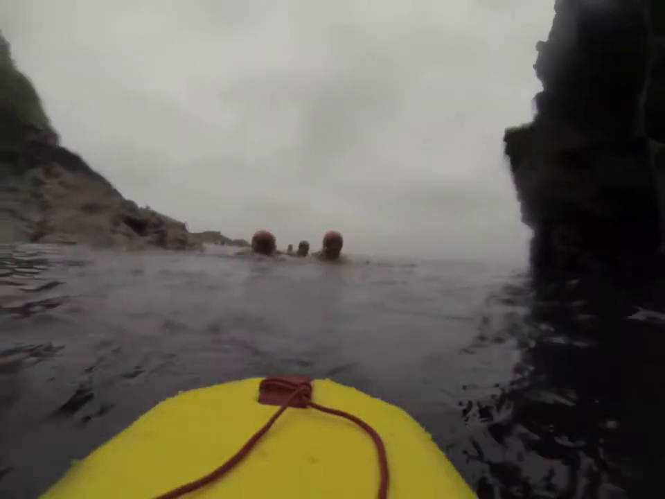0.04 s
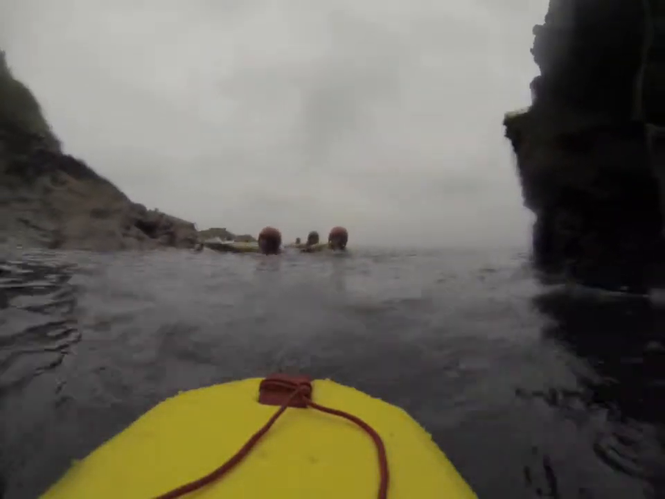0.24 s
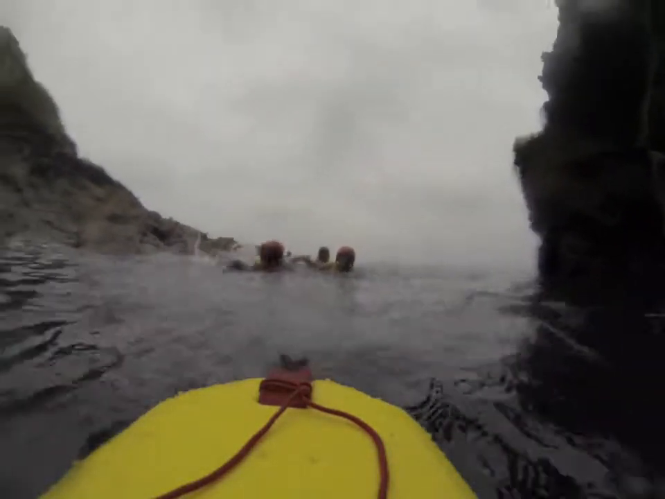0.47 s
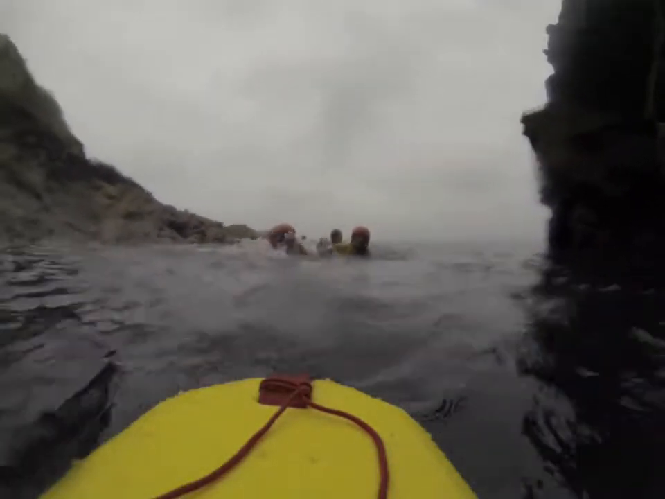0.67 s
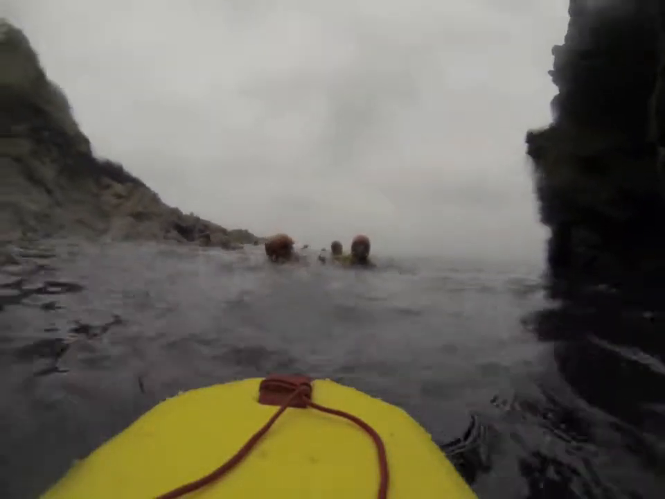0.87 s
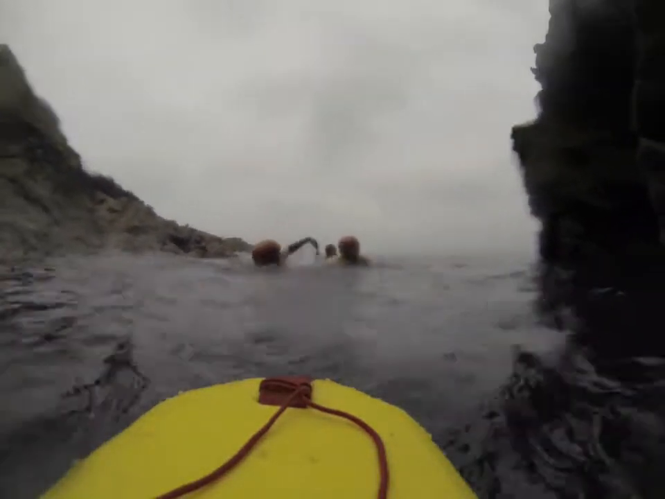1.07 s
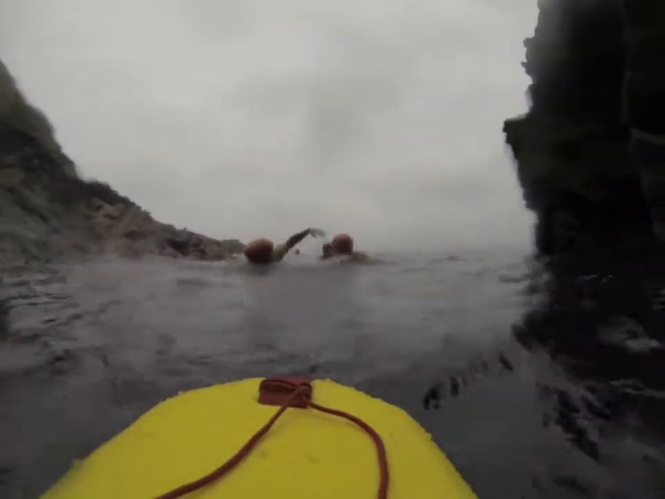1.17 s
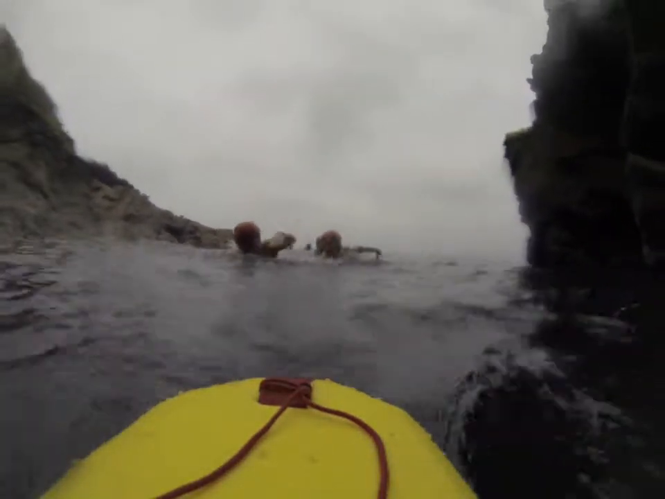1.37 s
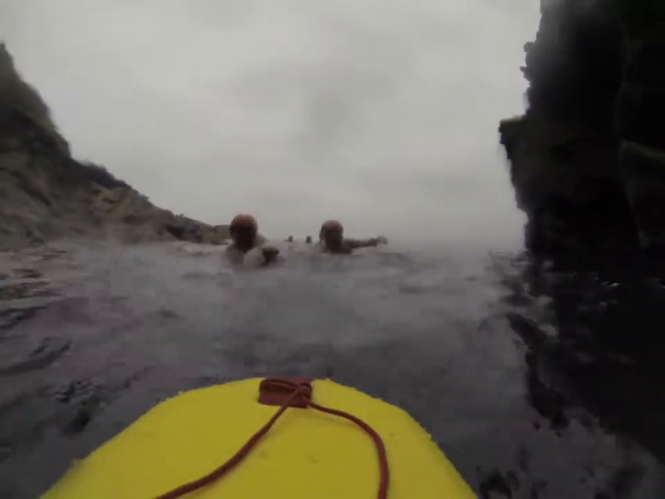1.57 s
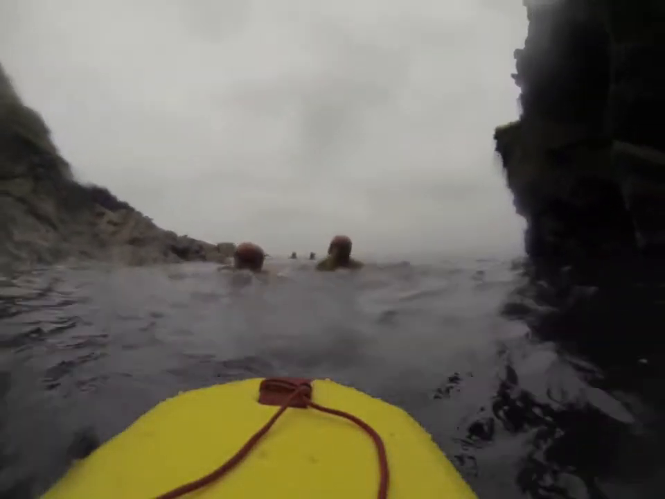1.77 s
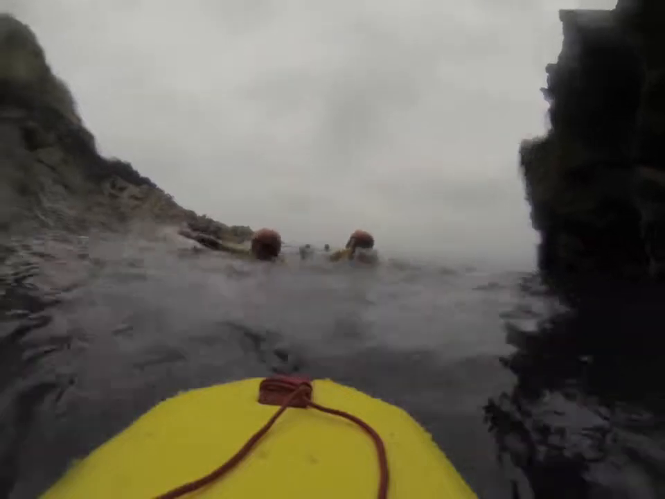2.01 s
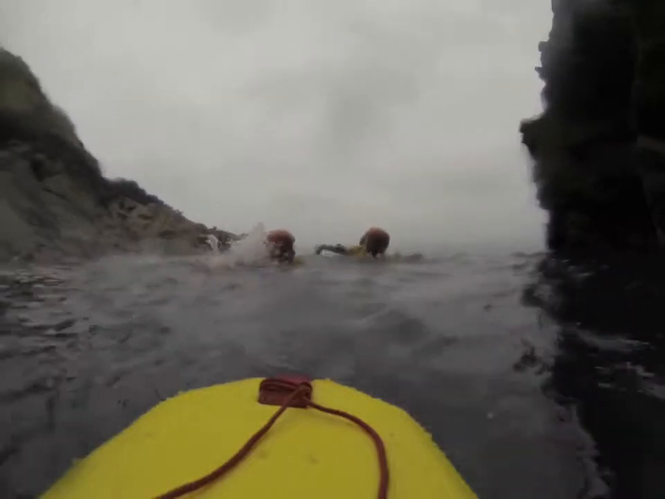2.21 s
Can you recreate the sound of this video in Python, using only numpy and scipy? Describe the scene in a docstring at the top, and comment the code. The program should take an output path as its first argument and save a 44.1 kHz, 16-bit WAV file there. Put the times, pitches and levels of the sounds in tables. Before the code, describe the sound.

Water slaps under a floating board, muffled and close in mono through a waterproof case. Soft hollow gulps cluster at 0.2-0.4 s; by far the loudest, a deep thump, lands at 0.58 s with a low shudder. A sharper drop knock comes at 0.85 s, weaker thuds near 0.9, 1.33, 1.8 and 2.08 s. Faint gurgling, bubble plips, wavering hollow rush and fine foam fizz run throughout, with tiny spray bursts around 1.65 and 2.1 s.

```python
"""Under a floating board on choppy sea water, heard from a waterproof case fixed on its deck.
Slapped air pockets thump and gulp as short falling rings; heavy wavelets thud the board as low rings.
The board shudders as a wandering low sine with rumble; drops ring the case's resonances.
Bubbles plip and gurgle as rising rings; spray, rush and fizz are coloured hiss mixed with clicks.
"""
import sys
import numpy as np
from scipy import signal
from scipy.fft import rfft, irfft
from scipy.io import wavfile
from scipy.ndimage import uniform_filter1d

SR = 44100
rng = np.random.default_rng(int(sys.argv[2]) if len(sys.argv) > 2 else 0)


def transcribe(u):
    """Save the signal u as a 16-bit wav file named by the first command-line argument.

    u: samples, shape (n,) or (channels, n), limited to [-1, 1]; the rate is SR.
    q: integer samples, one column per channel.
    """
    v = np.clip(np.atleast_2d(u).T, -1, 1)
    q = np.round(v * 32767).astype(np.int16)
    wavfile.write(sys.argv[1], SR, q)


N = 99225

# Spectra give relative amplitude; coloured() sets their rms to one.
# Air pockets slapped shut under the board: [t/s, peak level/dB, starting f/Hz, swell/s]
AIR_POCKETS = [(0.004, -42.5, 188.4, 0.0064), (0.163, -45, 213, 0.01), (0.195, -43, 205, 0.0053),
               (0.234, -35.5, 216, 0.0062), (0.260, -37, 228, 0.0036), (0.284, -36.5, 238, 0.0022),
               (0.318, -37.5, 213, 0.0043), (0.336, -38.5, 207, 0.0082), (0.392, -42, 231, 0.0066),
               (0.493, -48, 193, 0.01), (0.5798, -18.5, 187, 0.0048), (0.583, -30.5, 331, 0.0031),
               (0.601, -35.5, 192, 0.0042), (0.641, -42, 225, 0.0055), (0.695, -40, 201, 0.0045),
               (0.777, -49.5, 238, 0.0115), (0.803, -51, 197, 0.01), (0.858, -41.5, 228, 0.0055),
               (0.9084, -32, 218, .004), (0.924, -44.5, 195, 0.0054), (1.134, -37.5, 214, 0.0033),
               (1.332, -32.5, 195, 0.0035), (1.343, -54, 237, 0.0071), (1.365, -39.5, 204, 0.0057),
               (1.451, -43, 215, 0.0044), (1.772, -36, 225, 0.0052), (1.804, -29.5, 229, 0.0067),
               (1.832, -34, 203, 0.0059), (1.979, -48.5, 205, 0.0084), (2.0806, -35.5, 220, 0.0067)]
# Churning water over the slaps: [f/Hz, relative level/dB]
CHURN_SPECTRUM = [(150, 8), (450, 9), (750, -7), (1500, -33), (5000, -54)]
# Heavier wavelets that thud the board: [t/s, peak level/dB, f/Hz, swell/s]
BOARD_THUDS = [(0.246, -36.5, 70.4, 0.011), (0.287, -32, 84.4, 0.013), (0.329, -32, 46.4, 0.0059),
               (0.581, -13, 63.3, 0.0044), (0.607, -28.5, 86, 0.0083), (0.904, -28, 47.5, 0.0041),
               (0.905, -39.5, 120, 0.0071), (1.327, -33, 54.6, 0.0048), (1.369, -46, 75, 0.0093),
               (1.449, -39, 76, 0.011), (1.785, -36, 72.5, 0.0044), (1.818, -28.5, 69, 0.0078),
               (2.082, -28.5, 71.4, 0.0028)]
# Slow shudder of the board, before SHUDDER_GAIN_DB: [t/s, level/dB]
SHUDDER_LEVEL = [(0.0, -45), (0.32, -40.5), (0.35, -32.5), (0.56, -42.5), (0.6, -25.5), (0.68, -26),
                 (0.76, -52.5), (0.82, -35.5), (0.86, -61), (0.91, -32.5), (1.01, -44), (1.06, -59),
                 (1.47, -40.5), (1.78, -48.5), (1.88, -31), (2.09, -50.5), (2.21, -40), (2.25, -50)]
# Rumble of the board: [f/Hz, relative level/dB]
RUMBLE_SPECTRUM = [(15, -13.5), (35, -5.5), (55, -1.5), (85, -7), (130, -18.5), (300, -57), (1000, -93)]
# Drops that hit the case: [t/s, knock level before the mode levels/dB, tick peak level/dB, tick f/Hz]
CASE_DROPS = [(0.3324, -35.5, -76, 6300), (0.618, -41, -72, 6300), (0.8470, -26, -49.5, 11360),
              (0.9118, -40, -72, 6300), (1.0850, -42, -57, 6200), (1.0980, -49, -50, 6670),
              (1.3310, -43, -70, 6400), (1.371, -54, -63, 6400), (1.4460, -61, -52.5, 7160),
              (1.9908, -41, -73, 6300), (2.0258, -41, -70, 6300)]
# Resonances of the case: [f/Hz, level relative to the knock/dB, width/Hz]
CASE_MODES = [(1410, -3, 120), (2230, -28.5, 75), (3670, -19, 300), (4900, -32, 500), (6500, -37, 220)]
# Single bubbles that plip near the case: [t/s, peak level/dB, starting f/Hz]
SINGLE_BUBBLES = [(0.331, -49, 470), (0.571, -52, 750), (0.646, -55, 640), (0.904, -48, 430),
                  (0.912, -49, 698), (0.918, -44, 3350), (1.081, -46, 1740), (1.093, -46, 900),
                  (1.328, -50, 600), (1.432, -50, 880), (1.682, -47, 2270), (1.754, -54, 2320),
                  (1.868, -49.5, 2220), (1.942, -55, 2180), (2.228, -50, 603)]
# Small splashes of spray: [peak t/s, level/dB, Gaussian sigma/s]
SPRAY_BURSTS = [(0.393, -63, 0.015), (1.61, -62, 0.0088), (1.654, -58, 0.0098), (2.089, -55.5, .008),
                (2.14, -58.5, 0.039), (2.149, -55, 0.0054)]
# Spray: [f/Hz, relative level/dB]
SPRAY_SPECTRUM = [(1000, -7), (1900, -4), (2280, 9.5), (2800, -4.5), (3600, 8.5), (4300, -1), (4900, 0),
                  (5600, -8), (6400, -6), (8500, -16.5), (11000, -17.5), (14500, -32)]
# Gurgling along the edge of the board: [t/s, level/dB]
GURGLE_LEVEL = [(0, -71), (0.2, -63), (0.36, -60), (0.5, -79), (0.66, -65.5), (0.86, -72.5), (1.02, -65.5),
                (1.09, -65), (1.2, -72), (1.44, -62.5), (1.7, -71), (1.87, -56.5), (2.0, -73), (2.19, -81),
                (2.24, -53.5)]
# Hollow rush of the sea inside the case: [f/Hz, relative level/dB]
RUSH_SPECTRUM = [(40, 5.5), (80, -8), (200, -4.5), (320, -6), (560, -10.5), (790, -7), (1030, -11),
                 (1150, -9), (1280, 1.5), (1420, 1), (1580, -5), (1750, -10.5), (1960, -17.5),
                 (2800, -51.5)]
# Rush, before RUSH_GAIN_DB: [t/s, level/dB]
RUSH_LEVEL = [(0, -53.5), (0.09, -59.5), (0.2, -52.5), (0.29, -55), (0.39, -51.5), (0.5, -54),
              (0.62, -53.5), (0.72, -55), (0.8, -51), (0.93, -52.5), (1.2, -56.5), (1.55, -54),
              (1.75, -54.5), (1.88, -50), (1.98, -53.5), (2.06, -53.5), (2.25, -53.5)]
# Fine fizz of the foam, through the case: [f/Hz, relative level/dB]
FIZZ_SPECTRUM = [(1300, -24), (1900, -9), (2240, 0), (2760, -8.5), (3050, -3.5), (3330, 0), (3650, 3),
                 (4250, -10.5), (5000, -8.5), (5550, -16.5), (6350, -13), (7200, -18), (8100, -17),
                 (9000, -21.5), (11200, -23), (14800, -30.5)]
# Fizz: [t/s, level/dB]
FOAM_LEVEL = [(0, -64), (0.27, -64.5), (0.39, -63), (0.63, -61), (0.73, -61.5), (0.93, -61.5), (1.2, -63.5),
              (1.68, -61.5), (1.95, -62.5), (2.1, -62), (2.25, -60)]

POCKET_GLIDE_PER_S, CHURN_DB = -1.9, -45  # churn relative to the slap envelope
SHUDDER_HZ, SHUDDER_WANDER_SHARE, SHUDDER_WANDER_HZ = 24.9, 0.091, 4.63
SHUDDER_GAIN_DB, RUMBLE_DB = 1.5, -17  # rumble relative to the shudder
TICK_SWELL_S, KNOCK_SWELL_S = 0.00039, 0.0018  # knock: first case mode
PLIP_SWELL_CYCLES, PLIP_GLIDE_PER_S = 2.98, 2
BUBBLES_PER_S, BUBBLE_LOW_HZ, BUBBLE_HIGH_HZ = 600, 497, 1275
BUBBLE_SWELL_CYCLES, BUBBLE_GLIDE_PER_S, BUBBLE_RANGE_DB = 2.1, 2, 14
CLICKS_PER_S, CLICK_SPREAD_DB = 700, 4
RUSH_CLICK_DB, FIZZ_CLICK_DB, SPRAY_CLICK_DB = -7.5, -7, -1  # relative to smooth hiss
RUSH_GAIN_DB, RUSH_FLUTTER_DB, FIZZ_FLUTTER_DB, FLUTTER_HZ = 2, 1.05, 0.47, 24
RUSH_WAVER_SHARE, RUSH_WAVER_HZ = 0.02465, 6.98
CUTOFF_HZ = 15000


def from_db(db):
    """Decibels to amplitude gain."""
    return 10 ** (np.asarray(db) / 20)


def rms_one(x):
    """Scale to unit rms."""
    return x / np.sqrt(np.mean(x ** 2) + 1e-20)


def in_time(rows):
    """Join (time, value) rows by straight lines."""
    return np.interp(np.arange(N) / SR, *np.transpose(rows))


def drift(corner_hz):
    """Unit-rms slow noise: two equal low-pass poles at 1/40 of the sample rate, interpolated."""
    step, settle = 40, 2000
    pole = np.exp(-2 * np.pi * corner_hz * step / SR)
    noise = rng.standard_normal(N // step + settle + 2)
    slow = signal.lfilter([1], [1, -2 * pole, pole * pole], noise)[settle:]
    return np.interp(np.arange(N) / step, np.arange(len(slow)), rms_one(slow))


def coloured(x, spectrum):
    """Shape by a spectrum, linear in dB over log frequency; unit rms."""
    hz, db = np.transpose(spectrum)
    bins_hz = np.maximum(np.arange(N // 2 + 1) * SR / N, 1)
    gain = from_db(np.interp(np.log(bins_hz), np.log(hz), db))
    return rms_one(irfft(rfft(x) * gain, N))


def add_ring(out, start_s, peak_db, hz, swell_s, glide_per_s=0):
    """Add a sine that swells to its peak and dies away, gliding by a share of its pitch per second."""
    start = int(np.clip(start_s * SR, 0, N - 1))
    t = np.arange(min(int(10 * swell_s * SR), N - start)) / SR
    envelope = (t / swell_s * np.exp(1 - t / swell_s)) ** 2
    ring = np.sin(2 * np.pi * hz * t * (1 + glide_per_s * t / 2))
    out[start:start + len(t)] += from_db(peak_db) * envelope * ring


def crackle(click_db):
    """Smooth hiss mixed with the random clicks of bursting bubbles."""
    sizes_db = CLICK_SPREAD_DB * np.minimum(rng.exponential(1, N), 5)
    sizes = from_db(sizes_db) * rng.choice([-1, 1], N)
    clicks = sizes * (rng.random(N) < CLICKS_PER_S / SR)
    return rng.standard_normal(N) + from_db(click_db) * rms_one(clicks)


def slaps():
    """Each air pocket rings for a few cycles, falling in pitch; churning water follows its envelope."""
    rings = np.zeros(N)
    for start_s, peak_db, hz, swell_s in AIR_POCKETS:
        add_ring(rings, start_s, peak_db, hz, swell_s, POCKET_GLIDE_PER_S)
    envelope = np.abs(signal.hilbert(rings))
    churn = coloured(rng.standard_normal(N), CHURN_SPECTRUM)
    return rings + from_db(CHURN_DB) * envelope * churn


def board_thuds():
    """Heavier wavelets ring the board low and briefly."""
    out = np.zeros(N)
    for start_s, peak_db, hz, swell_s in BOARD_THUDS:
        add_ring(out, start_s, peak_db, hz, swell_s)
    return out


def board_shudder():
    """The board shudders as a low sine of wandering pitch; its rumble follows the same level."""
    hz = SHUDDER_HZ * (1 + SHUDDER_WANDER_SHARE * drift(SHUDDER_WANDER_HZ))
    shudder = rms_one(np.sin(2 * np.pi * np.cumsum(hz) / SR))
    rumble = from_db(RUMBLE_DB) * coloured(rng.standard_normal(N), RUMBLE_SPECTRUM)
    level = from_db(in_time(SHUDDER_LEVEL) + SHUDDER_GAIN_DB)
    return uniform_filter1d(level, size=800) * (shudder + rumble)


def drops():
    """A drop ticks and knocks the case; the wider resonances die sooner."""
    out = np.zeros(N)
    first_width_hz = CASE_MODES[0][2]
    for start_s, knock_db, tick_db, tick_hz in CASE_DROPS:
        add_ring(out, start_s, tick_db, tick_hz, TICK_SWELL_S)
        for hz, mode_db, width_hz in CASE_MODES:
            add_ring(out, start_s, knock_db + mode_db, hz, KNOCK_SWELL_S * first_width_hz / width_hz)
    return out


def plips():
    """Single bubbles ring briefly, rising in pitch."""
    out = np.zeros(N)
    for start_s, peak_db, hz in SINGLE_BUBBLES:
        add_ring(out, start_s, peak_db, hz, PLIP_SWELL_CYCLES / hz, PLIP_GLIDE_PER_S)
    return out


def spray():
    """Breaking wavelets give brief bright bursts of hiss and clicks."""
    t = np.arange(N) / SR
    level = np.zeros(N)
    for peak_s, db, sigma_s in SPRAY_BURSTS:
        level += from_db(db) * np.exp(-.5 * ((t - peak_s) / sigma_s) ** 2)
    return level * coloured(crackle(SPRAY_CLICK_DB), SPRAY_SPECTRUM)


def gurgle():
    """Small bubbles ring at random, rising in pitch."""
    out = np.zeros(N)
    for when, pitch, size in rng.random((int(BUBBLES_PER_S * N / SR), 3)):
        hz = BUBBLE_LOW_HZ * (BUBBLE_HIGH_HZ / BUBBLE_LOW_HZ) ** pitch
        swell_s = BUBBLE_SWELL_CYCLES / hz
        add_ring(out, when * N / SR, -BUBBLE_RANGE_DB * size, hz, swell_s, BUBBLE_GLIDE_PER_S)
    return from_db(in_time(GURGLE_LEVEL)) * rms_one(out)


def rush():
    """Hollow rush of the sea; reading it at a varying speed makes its pitch waver."""
    steady = coloured(crackle(RUSH_CLICK_DB), RUSH_SPECTRUM)
    position = np.cumsum(1 + RUSH_WAVER_SHARE * drift(RUSH_WAVER_HZ))
    wavering = np.interp(position % N, np.arange(N), steady)
    level_db = in_time(RUSH_LEVEL) + RUSH_GAIN_DB + RUSH_FLUTTER_DB * drift(FLUTTER_HZ)
    return from_db(level_db) * wavering


def fizz():
    """Foam fizzes finely: hiss and bubble clicks, fluttering in level."""
    level_db = in_time(FOAM_LEVEL) + FIZZ_FLUTTER_DB * drift(FLUTTER_HZ)
    return from_db(level_db) * coloured(crackle(FIZZ_CLICK_DB), FIZZ_SPECTRUM)


def scene():
    """Sum the water, board and case in one channel."""
    main = slaps() + board_thuds() + board_shudder()
    details = drops() + plips() + spray()
    background = gurgle() + rush() + fizz()
    return (main + details + background)[None]


def record(dry):
    """Cut the top steeply with an elliptic low-pass."""
    low_pass = signal.ellip(10, .1, 80, CUTOFF_HZ, fs=SR, output="sos")  # ripple, stopband in dB
    return signal.sosfilt(low_pass, dry)


dry = scene()
out = record(dry)
transcribe(out)
```